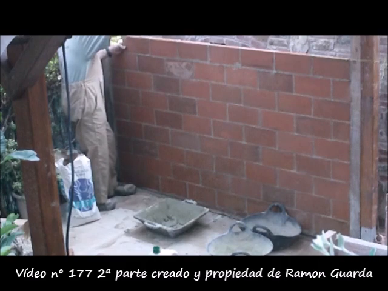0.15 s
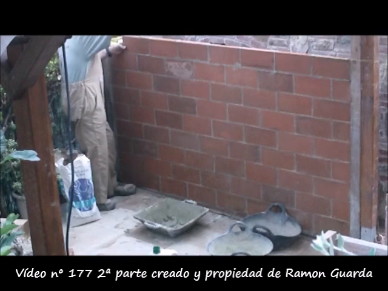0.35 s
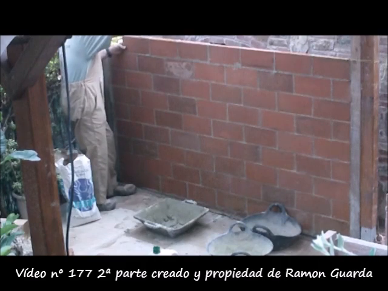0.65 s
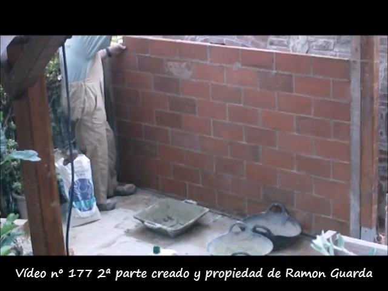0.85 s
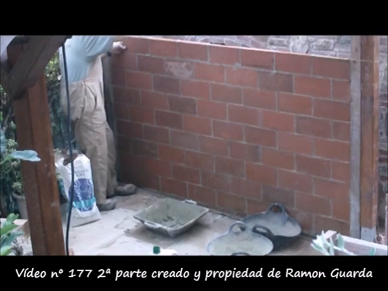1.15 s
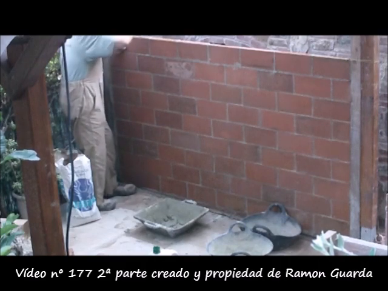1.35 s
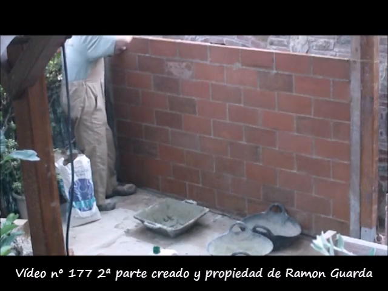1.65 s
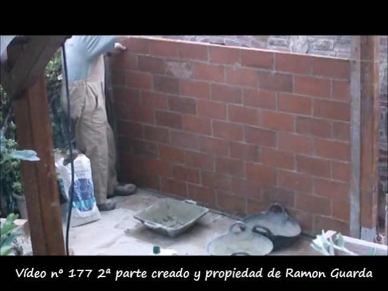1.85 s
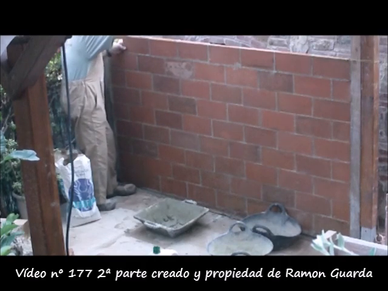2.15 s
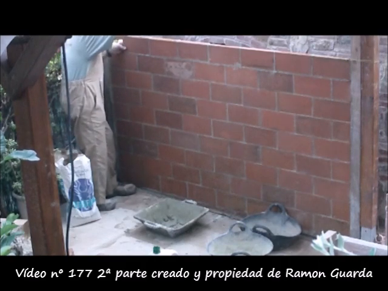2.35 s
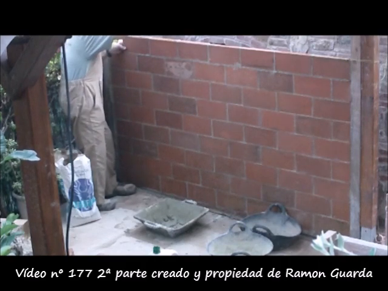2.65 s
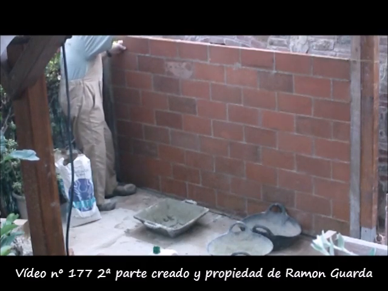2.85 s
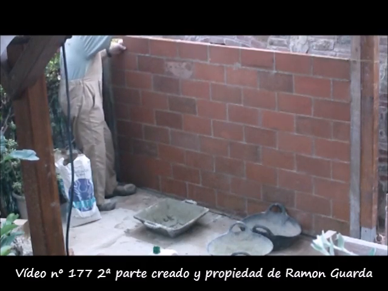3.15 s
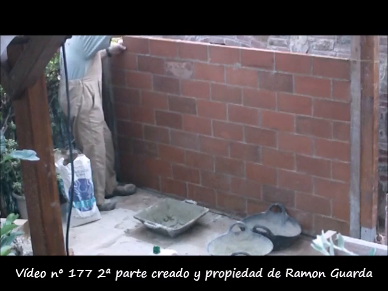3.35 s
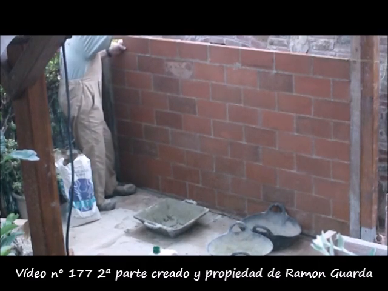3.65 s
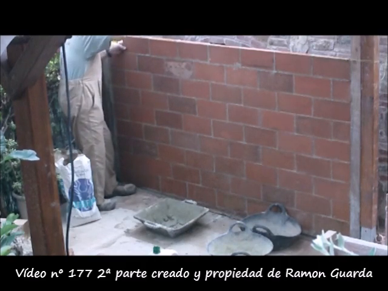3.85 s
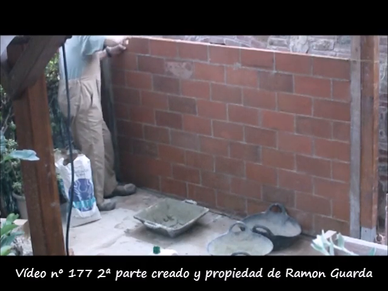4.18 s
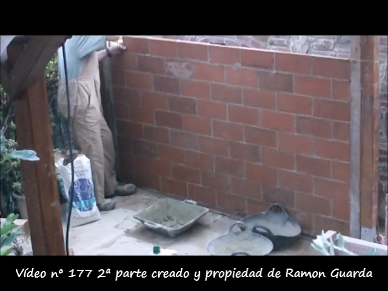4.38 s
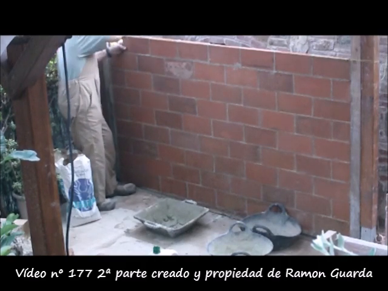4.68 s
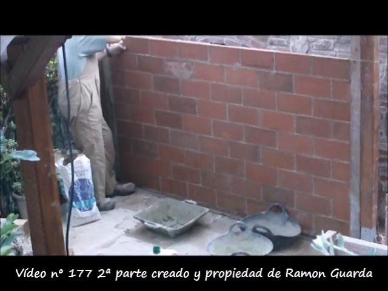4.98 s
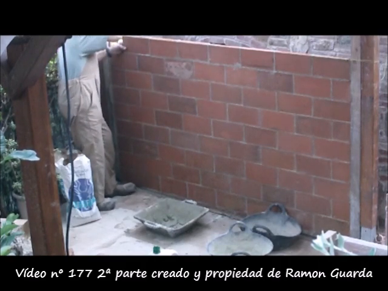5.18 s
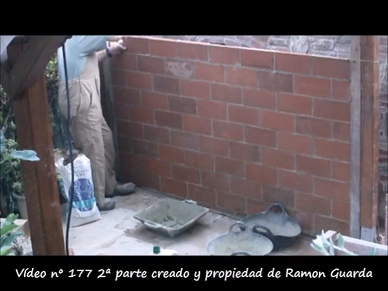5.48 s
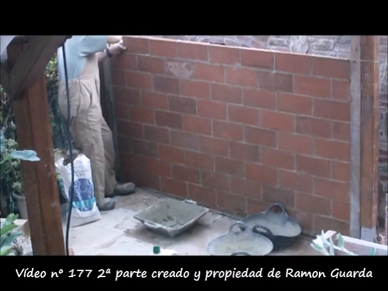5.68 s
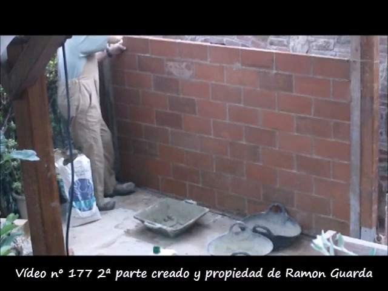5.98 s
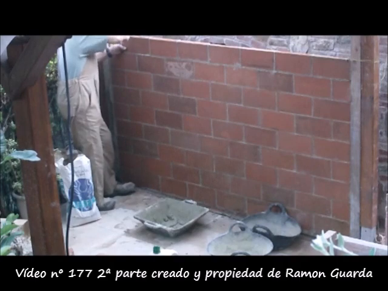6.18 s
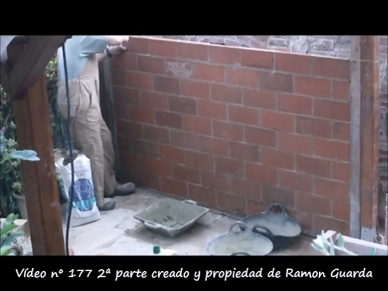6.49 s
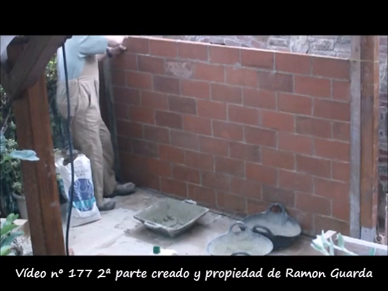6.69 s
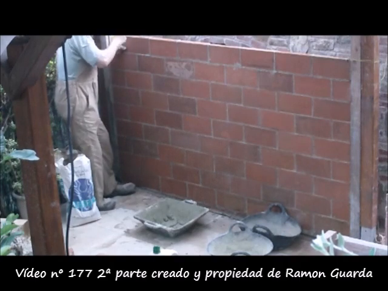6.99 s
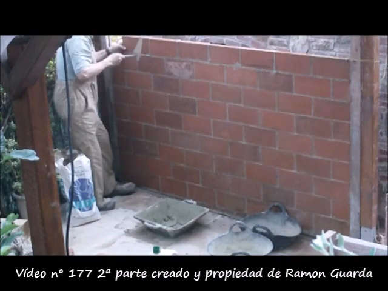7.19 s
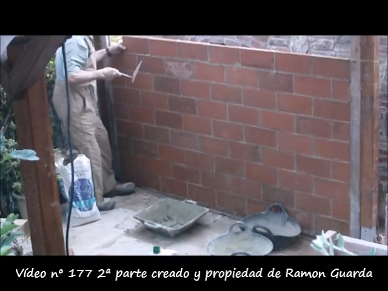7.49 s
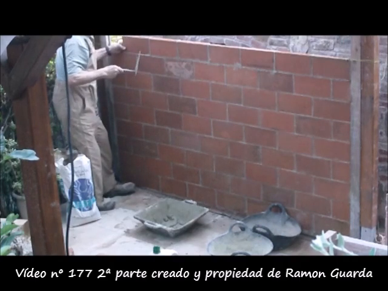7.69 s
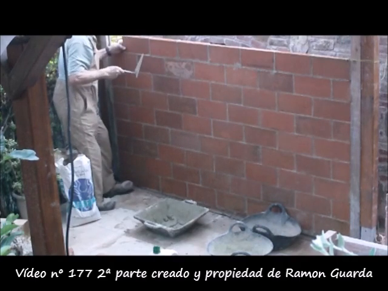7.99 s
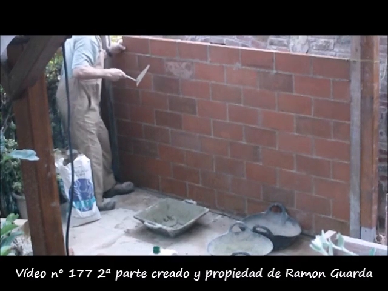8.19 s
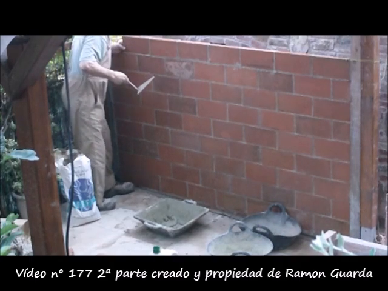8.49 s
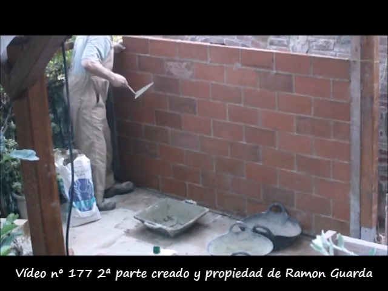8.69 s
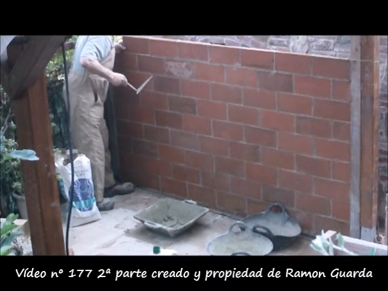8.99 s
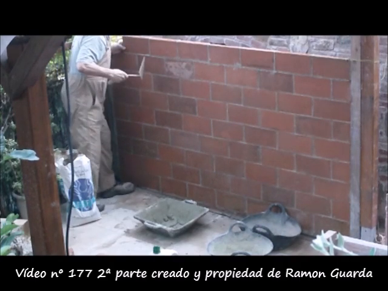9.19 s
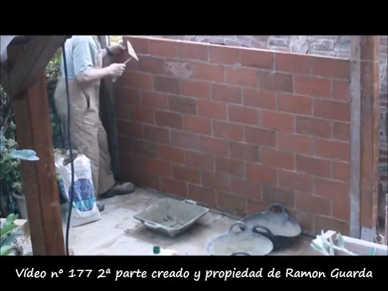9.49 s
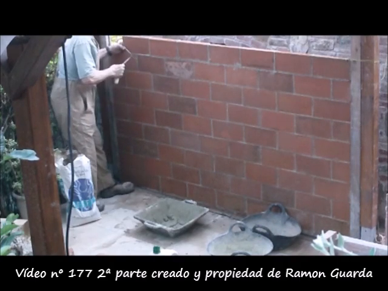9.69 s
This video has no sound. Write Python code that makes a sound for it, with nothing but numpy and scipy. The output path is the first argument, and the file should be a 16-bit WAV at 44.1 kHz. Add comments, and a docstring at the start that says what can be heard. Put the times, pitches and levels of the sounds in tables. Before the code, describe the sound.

Steel trowel taps on a hollow brick atop a thin wall, gritty mortar crunch, short yard echo, soft hiss and a few wind bumps.

```python
"""Light trowel taps on a brick, bedded on top of a thin wall in a small yard, amid wind gusts, hiss and hum.
Each tap is a steel tick and blade ring, then decaying modes of hollow brick and wall with a crunch of mortar;
delayed copies and a noise tail bring it back from nearby surfaces. Wind is swelling filtered noise and
dull pressure bumps at the microphone; the hiss sinks gently twice. Short noise bursts are shifting boots,
and wavering sine whistles are a faint far bird."""
import sys
import numpy as np
from scipy import signal
from scipy.fft import rfft, irfft
from scipy.io import wavfile
from scipy.ndimage import uniform_filter1d

SR = 44100
rng = np.random.default_rng(int(sys.argv[2]) if len(sys.argv) > 2 else 0)


def pcm_store(signal):
    """Save signal as 16-bit PCM."""
    levels = np.round(np.clip(np.atleast_2d(signal), -1, 1) * 32767)
    wavfile.write(sys.argv[1], SR, levels.astype(np.int16).T)


N = 433944  # length in samples


def undb(db):
    """Turn dB into an amplitude factor."""
    return 10 ** (np.asarray(db) / 20)


def unit(x):
    """Scale to an rms of 1."""
    return x / np.sqrt(np.mean(x ** 2))


def fade(t, t60):
    """Exponential decay that falls 60 dB in t60 seconds."""
    return np.exp(-np.log(1000) * t / t60)


def add(track, start, x):
    """Mix x into the track from a time in s."""
    i = max(int(start * SR), 0)
    track[i:i + len(x)] += x[:N - i]


def noise(spectrum, size):
    """Noise of rms 1 coloured by (frequency [Hz], level [dB]) points, joined on a log frequency axis."""
    hz, db = np.transpose(spectrum)
    f = np.maximum(np.fft.rfftfreq(size, 1 / SR), 1)
    colour = undb(np.interp(np.log(f), np.log(hz), db))
    return unit(irfft(rfft(rng.standard_normal(size)) * colour, size))


def ring(t, hz, db, t60):
    """One struck mode, a decaying sine; its strength, pitch and sign are varied at random."""
    size_db, detune = rng.standard_normal(2) * [1.5, .004]
    tone = np.sin(2 * np.pi * hz * (1 + detune) * t)
    return undb(db + size_db) * fade(t, t60) * tone * rng.choice([-1, 1])


def delay(x, hz, samples):
    """Delay by about a sample, by an amount that depends on frequency."""
    f = np.fft.rfftfreq(N, 1 / SR)
    lag_s = np.interp(f, hz, samples) / SR
    return irfft(rfft(x) * np.exp(-2j * np.pi * f * lag_s), N)


def hum(rumble_db=-65):
    """Mains hum and faint machine tones, steady sines over a low rumble of noise."""
    # steady tones: (frequency [Hz], rms level [dB])
    hum_lines = [(50, -56.5), (120, -76), (259, -80)]
    # rumble spectrum: (frequency [Hz], relative level [dB])
    rumble = [(5, 1), (18, 2.0), (40, -25), (70, -6.5), (110, -16.0), (200, -15.0), (600, -47)]
    t = np.arange(N) / SR
    tones = sum(np.sqrt(2) * undb(db) * np.sin(2 * np.pi * (hz * t + rng.random())) for hz, db in hum_lines)
    return tones + undb(rumble_db) * noise(rumble, N)


def hiss(air_db=-51, dip_width_s=0.56):
    """Even hiss that sinks and returns, mostly shared by both channels but more separate in the treble."""
    # hiss spectrum: (frequency [Hz], relative level [dB per Hz])
    air = [(59, -36), (100, -8), (123, -5), (146, -11.5), (173, -11.5), (253, -8), (287, -8), (640, -1),
           (697, -1.5), (742, 0), (1460, -0.5), (5280, -8), (14500, -14), (15500, -14)]
    # power share that each channel has to itself: (frequency [Hz], share [0-1])
    apart = [(200, .05), (700, .014), (1400, .004), (2200, .003), (3000, .04), (4000, .2), (8000, .5)]
    # gentle sinks in level: (time at the bottom [s], depth [dB])
    dips = [(1.3, 4), (6.05, 4)]
    own = np.interp(np.fft.rfftfreq(N, 1 / SR), *np.transpose(apart))
    shared, left, right = (rfft(noise(air, N)) for _ in range(3))
    pair = irfft(np.sqrt(1 - own) * shared + np.sqrt(own) * np.array([left, right]), N)
    t = np.arange(N) / SR
    sunk_db = sum(depth * np.exp(-.5 * ((t - bottom) / dip_width_s) ** 2) for bottom, depth in dips)
    return pair * undb(air_db - sunk_db)


def bird(waver=.0065):
    """Thin far whistles: sines whose pitch wavers by a small share and rises slightly."""
    # peeps: (time at the centre [s], length [s], pitch [Hz], level [dB], rise [share of the pitch])
    peeps = [(3.58, .16, 4920, -64, .01), (8.825, .15, 5255, -63, .012), (9.16, .12, 5235, -61.5, .006),
             (9.44, .17, 5170, -62, .022)]
    out = np.zeros(N)
    for centre, length, hz, db, rise in peeps:
        size = int(length * SR)
        wander = unit(uniform_filter1d(rng.standard_normal(size), size=300))
        pitch = hz * (1 + rise * np.linspace(-.5, .5, size) + waver * wander)
        whistle = np.sin(2 * np.pi * np.cumsum(pitch) / SR)
        add(out, centre - length / 2, undb(db) * np.hanning(size) ** .5 * whistle)
    return out


def wind(steepness=1.95, low_hz=14, push=1.6, recovery_hz=8, eddy_hz=98, eddy_db_per_octave=13):
    """Gusts push the diaphragm, which swings back; faster air brings smaller eddies and a higher corner."""
    # gusts: (time at the peak [s], level [dB], attack width [s], release time constant [s])
    gusts = [(.34, -47, 0.0099, 0.33), (1.049, -35, .03, .15), (1.31, -39, .035, 0.096),
             (3.761, -48, .041, 0.14), (5.752, -33, 0.018, 0.035), (5.784, -20, 0.0098, 0.041),
             (5.92, -38, .04, 0.16)]
    out = np.zeros(N)
    t = np.arange(SR) / SR - .25  # zero at the peak
    hz = np.geomspace(6, 1536, num=17)[:, None]
    bands = [[(f / 1.5, -40), (f / 1.15, 0), (f * 1.15, 0), (f * 1.5, -40), (f * 3, -120)] for f in hz[:, 0]]
    recovery = signal.butter(2, recovery_hz, "highpass", fs=SR, output="sos")
    for peak, db, attack, release in gusts:
        swell = np.exp(np.where(t < 0, -.5 * (t / attack) ** 2, -t / release)) + 1e-6
        # the corner is eddy_hz at 0 dB and halves with each eddy_db_per_octave drop in level
        corner_hz = eddy_hz * 2 ** ((db + 20 * np.log10(swell)) / eddy_db_per_octave)
        shape = hz ** 2 / (hz ** 2 + low_hz ** 2) / np.sqrt(1 + (hz / corner_hz) ** (2 * steepness))
        eddies = np.array([noise(band, len(t)) for band in bands]) * np.sqrt(hz)
        # the moving corner changes the colour, while the swell alone sets the loudness
        gust = swell * np.sum(shape * eddies, axis=0) / np.linalg.norm(shape * np.sqrt(hz), axis=0)
        gust *= np.linalg.norm(swell) / np.linalg.norm(gust)
        pressure = push * signal.sosfilt(recovery, swell)
        add(out, peak + t[0], undb(db) * (gust - pressure))
    return out


def buffets(recovery_hz=5):
    """The low-pressure core of each strong eddy sweeps over the microphone port as one dull bump."""
    # single eddies: (time at the centre [s], peak level before the high-pass [dB], half-width [s])
    strong_eddies = [(.33, -46, 0.01), (1.008, -38, 0.0064), (1.046, -27, 0.0072), (1.094, -24.5, 0.0027),
                     (1.124, -25.5, .0045), (1.178, -34, 0.0028), (1.265, -28, .004), (1.331, -30, 0.0043),
                     (5.772, -13, 0.0022), (5.779, -9.5, 0.0016), (5.796, -10.5, 0.0016),
                     (6.018, -36, 0.0088)]
    t = np.arange(N) / SR
    suction = sum(undb(db) / (1 + ((t - centre) / width) ** 2) for centre, db, width in strong_eddies)
    recovery = signal.butter(2, recovery_hz, "highpass", fs=SR, output="sos")
    return -signal.sosfilt(recovery, suction)


def thuds():
    """Boots settle softly on the concrete: short swells of low noise as the worker shifts his feet."""
    # footfalls: (start time [s], level [dB], length [s])
    steps = [(3.19, -71, .07), (6.71, -57.5, .1), (7.735, -58.5, 0.035), (8.47, -69, 0.017)]
    # thud spectrum: (frequency [Hz], relative level [dB])
    thud_spectrum = [(50, -20), (90, -3), (150, -5), (280, -5), (450, -21), (1000, -50)]
    out = np.zeros(N)
    for start, db, length in steps:
        size = int(length * SR)
        add(out, start, undb(db) * np.hanning(size) ** .5 * noise(thud_spectrum, SR)[:size])
    return out


def taps(wall_db=-43, brick_db=-41, blade_db=-50, tick_db=-50, crunch_db=-40, focus_db=9, tick_t60=0.25):
    """The steel ticks and rings first; brick and wall take a moment to ring up while the mortar crunches."""
    # taps: (time [s], level [dB], steel level, high when the blade's edge lands [dB], brick ring level [dB],
    # blade pitch, set by where it touches [Hz], focus, the wall pitch driven hardest [Hz], focus boost [dB])
    tap_list = [(0.585, -18, 5, 16, 4550, 820, -1), (.933, -3.5, 1, 9, 5020, 840, -1.5),
                (2.185, -18.5, 13, 9, 4440, 1130, 0.5), (2.55, -3.5, -1, 11, 5180, 855, 5),
                (3.416, -5.5, 1, 2, 4300, 774, -0.5), (3.716, 0, 1, 3, 4840, 785, -1.5),
                (4.729, -3.5, -4, -3, 4800, 940, -3.5), (5.099, -1.5, 2.5, 3, 4530, 670, -2.5),
                (5.464, 1, -3, 1, 5570, 770, -0.5), (5.846, 0, -2, -0.5, 6400, 830, -1.5),
                (6.221, -.5, -3, 2, 4350, 1163, 2), (6.582, 1.5, -4.5, -0.5, 4560, 1120, 1.5)]
    # wall modes: (frequency [Hz], relative level [dB], t60 [s])
    wall_modes = [(288.6, -17.5, 0.62), (398, 3, 0.15), (445, -9.5, 0.52), (531, 0.5, 0.18),
                  (620, -3, 0.15), (695.6, 3, 0.13), (761, 1.5, 0.25), (883, 15, 0.047), (933, 6.5, 0.076),
                  (981, 3.5, 0.19), (1032, 12.5, 0.065), (1108.5, 4, 0.18), (1151, -5, 0.2),
                  (1174, 6.5, 0.16), (1288, 13, 0.052), (1421, 8.5, 0.066), (1545, 5.5, 0.15),
                  (1832, 5.5, 0.092), (2043, 7.5, 0.14), (2168, 1.5, .16), (2530, -3.5, .14),
                  (2975, 0.5, 0.13)]
    # hollow brick modes: (multiple of the brick's pitch, relative level [dB], t60 [s])
    brick_modes = [(.915, -6, .06), (.96, -1, .075), (1, 1, .075), (1.04, -3, .06)]
    # steel blade modes: (multiple of the blade's pitch, relative level [dB], t60 [s])
    blade_modes = [(1.002, -3.5, 0.14), (1.035, -2, .06), (1.64, 1.5, 0.062), (1.7, -25, 0.037),
                   (2.35, -3, 0.043)]
    # spectrum of the edge's tick: (frequency [Hz], relative level [dB])
    tick_spectrum = [(300, -34), (1200, -24), (2400, -2), (3600, 1), (5000, 0), (8000, -5.5), (12000, -0.5),
                     (15500, -39)]
    # spectrum of the mortar's crunch: (frequency [Hz], relative level [dB])
    crunch_spectrum = [(120, -45), (300, -4), (550, -1), (750, -2), (1150, -42), (1550, -2), (2200, -8),
                       (2800, -12), (3400, -40), (7000, -35)]
    # the brick settles on its bed around this time and over this span, and its pitch drops
    seated_s, seating_s = 5.8, 0.19
    brick_loose_hz, brick_seated_hz = 2291, 2080
    focus_width_octaves = .3

    out, t = np.zeros(N), np.arange(SR // 2) / SR
    ring_up = 1 - np.exp(-(t / .0034) ** 1.3)
    for start, db, steel_db, ring_db, blade_hz, focus_hz, boost_db in tap_list:
        seated = 1 / (1 + np.exp((seated_s - start) / seating_s))
        brick_hz = brick_loose_hz + seated * (brick_seated_hz - brick_loose_hz)

        # the boost is centred on the focus; the drive falls away up to an octave from it
        octaves = np.abs(np.log2(np.array(wall_modes)[:, 0] / focus_hz))
        boost = boost_db * np.exp(-.5 * (octaves / focus_width_octaves) ** 2)
        drive_db = boost - focus_db * np.minimum(octaves, 1)

        wall = sum(ring(t, hz, mode_db + drive, t60) for (hz, mode_db, t60), drive in zip(wall_modes, drive_db))
        brick = sum(ring(t, brick_hz * ratio, mode_db, t60) for ratio, mode_db, t60 in brick_modes)
        blade = sum(ring(t, blade_hz * ratio, mode_db, t60) for ratio, mode_db, t60 in blade_modes)
        # the struck spot itself gives one heavily damped knock
        knock = ring(t, focus_hz, db=9 + boost_db, t60=.028)

        # sand grains give way in uneven spurts
        spurts_db = 4 * unit(uniform_filter1d(rng.standard_normal(len(t)), size=130))
        crunch = noise(crunch_spectrum, len(t)) * unit(undb(spurts_db)) * fade(t, .13)
        tick = noise(tick_spectrum, len(t)) * (fade(t, tick_t60) + fade(t, .01))

        body = undb(wall_db) * (wall + knock) + undb(brick_db + ring_db) * brick + undb(crunch_db) * crunch
        steel = undb(tick_db) * tick + undb(blade_db) * blade
        add(out, start, undb(db) * (body * ring_up + undb(steel_db) * steel))
    return out


def yard(x, tail_db=-8, tail_t60=0.4):
    """A few near echoes, dulled by rough masonry, and a short diffuse tail."""
    # echoes from wall, ground and roof: (delay [s], gain relative to the direct sound)
    echoes = [(.0028, .45), (.0043, .55), (.0115, .35), (.015, .3), (.0235, .2), (.035, .2)]
    t = np.arange(SR // 2) / SR
    response = np.zeros(N)
    response[0] = 1  # direct sound
    bounce = np.exp(-t / .00003)  # a brief smear takes off treble
    for lag, gain in echoes:
        add(response, lag, gain * bounce / bounce.sum())
    tail = rng.standard_normal(len(t)) * fade(t, tail_t60) * (1 - np.exp(-t / 0.0025))
    add(response, 0, undb(tail_db) * tail / np.linalg.norm(tail))
    return signal.fftconvolve(x, response[:len(t)] / np.sqrt(2))[:N]


def scene(low_pan_db=-3):
    """Taps and hiss reach the left channel a hair later; wind and hum are a little stronger on the right."""
    # lateness of the left channel: (frequency [Hz], delay of the taps [samples], delay of the hiss [samples])
    left_lag = [(2500, .8, 0), (4000, .8, .7), (12000, 1.15, 1.15)]
    hz, tap_lag, air_lag = np.transpose(left_lag)
    lean = undb(np.array([[low_pan_db], [-low_pan_db]]) / 2)
    work = yard(taps())
    air_left, air_right = hiss()
    left = delay(work, hz, tap_lag) + delay(air_left, hz, air_lag)
    right = work + air_right
    return np.array([left, right]) + bird() + thuds() + lean * (wind() + buffets() + hum())


def record(dry, top_hz=15300):
    """The recorder cuts the top with a steep low-pass."""
    return signal.sosfilt(signal.ellip(10, .1, 80, top_hz, fs=SR, output="sos"), dry)


dry = scene()
out = record(dry)
pcm_store(out)
```